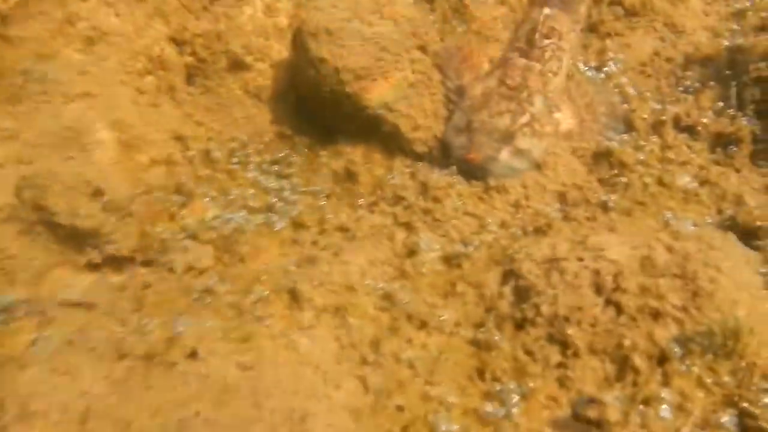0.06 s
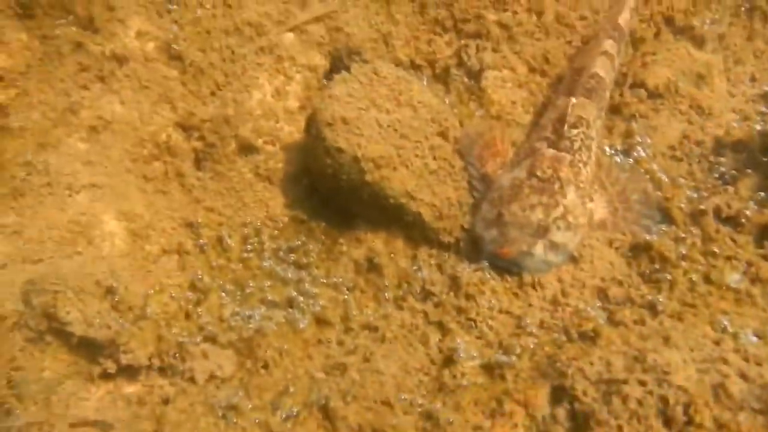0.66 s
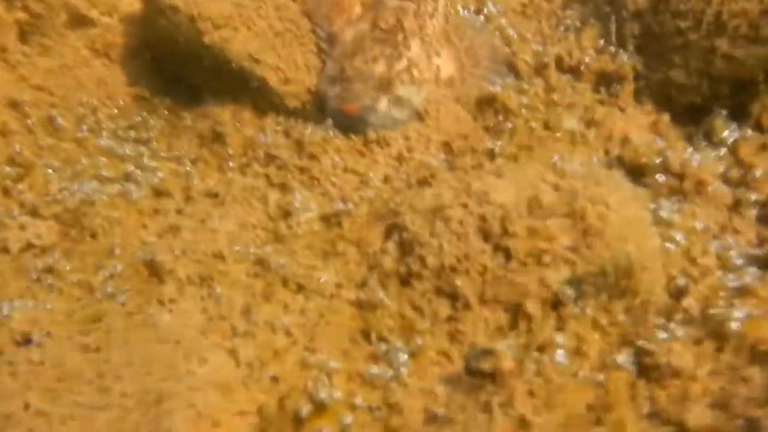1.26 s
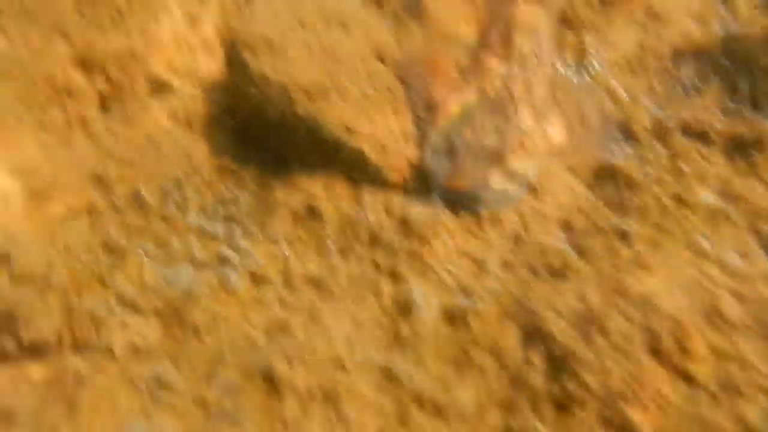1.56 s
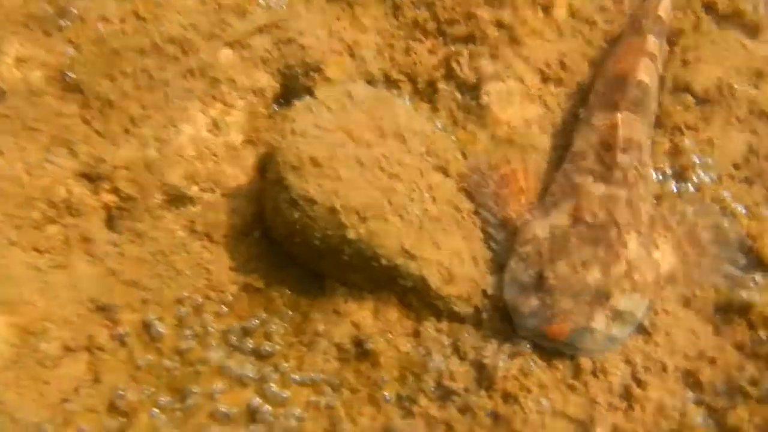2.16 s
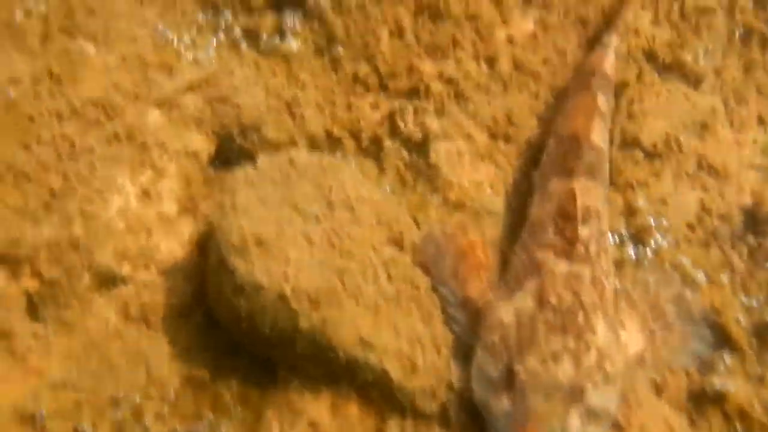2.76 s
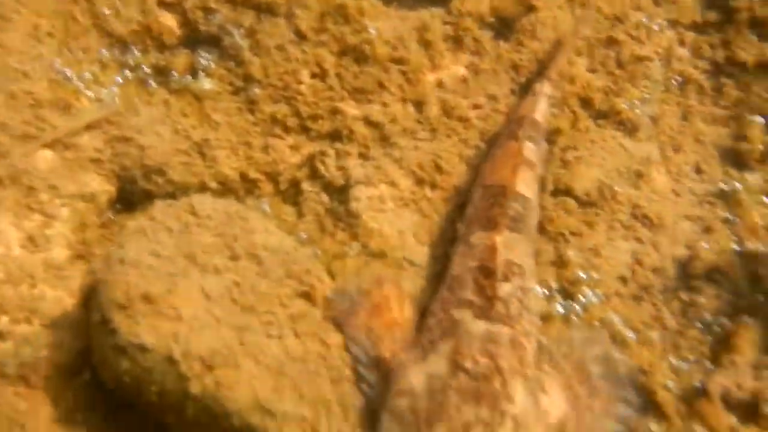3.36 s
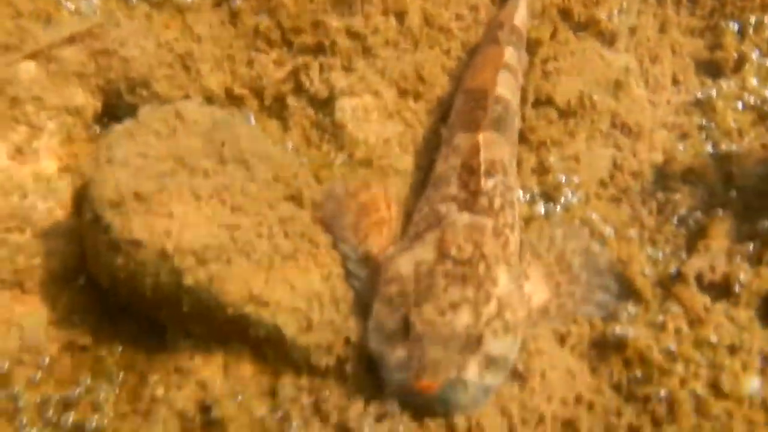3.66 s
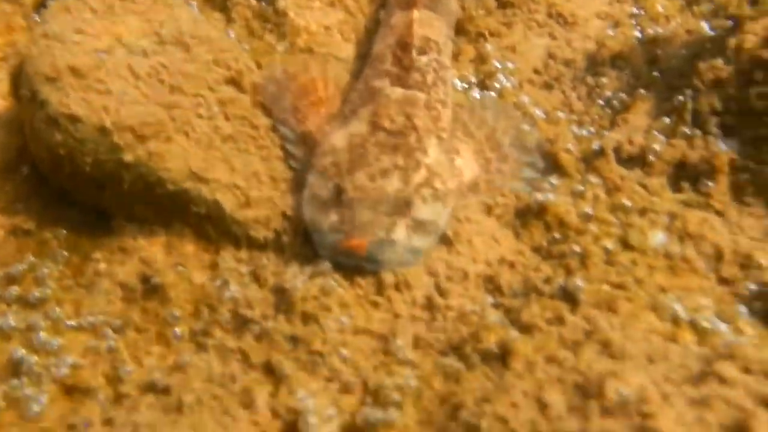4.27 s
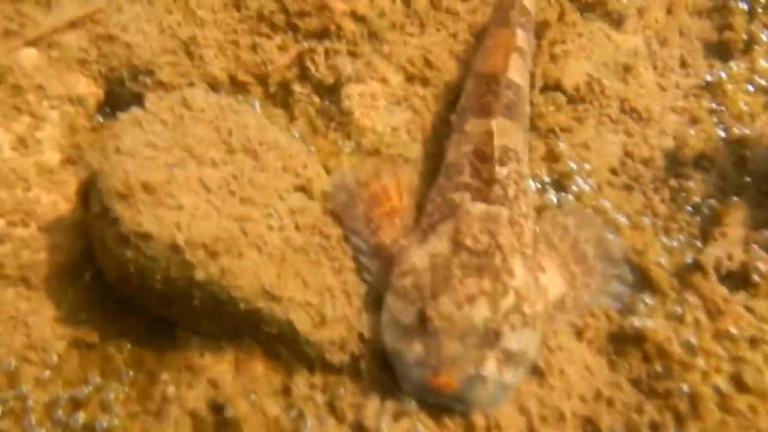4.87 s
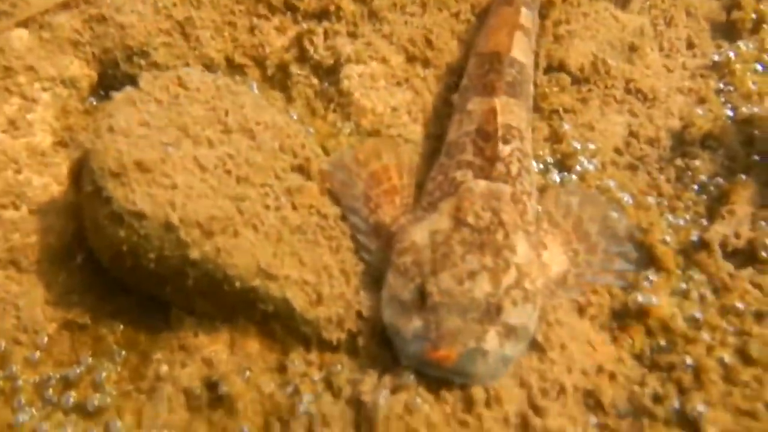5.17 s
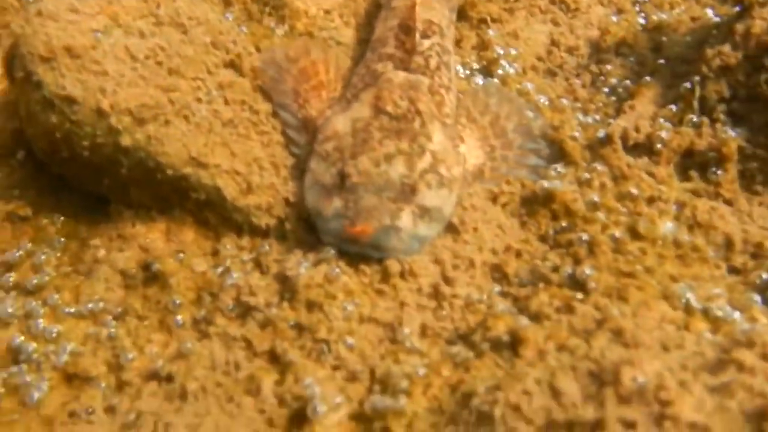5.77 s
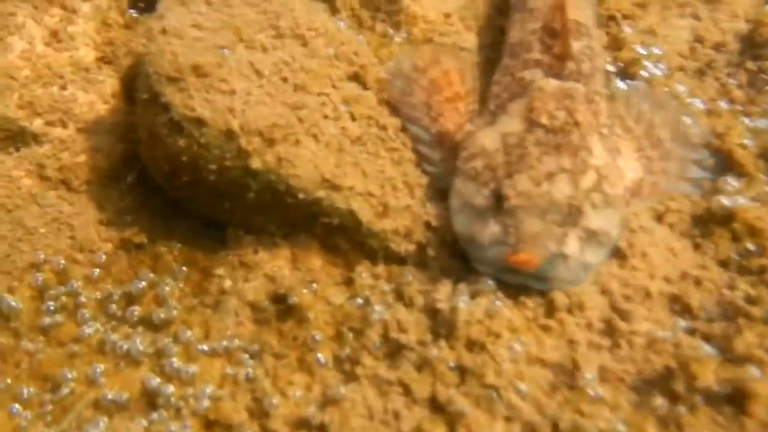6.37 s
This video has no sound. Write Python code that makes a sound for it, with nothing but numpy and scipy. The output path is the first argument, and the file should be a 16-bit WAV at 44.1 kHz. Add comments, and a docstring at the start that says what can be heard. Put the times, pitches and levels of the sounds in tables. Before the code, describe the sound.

A shallow stream is heard through a camera held under water. A low, wavering rumble runs throughout, with irregular dull thumps and glugs from the current, mostly on the left. Beneath it are a soft muffled rush and a faint, fluttering electronic whine. A brief tick comes about halfway. Near the end a finger knocks and rubs on the casing, close and loud, and the water briefly dips in level.

```python
"""In a shallow stream, a camera is held under water. Turbulent pressure rumbles on its two microphone
ports, and eddies break on them with dull thumps, mostly on the left; two of the loudest overload the
recorder with a brief tick. A steady muffled rush and the faint whine of the electronics come through
the casing. Towards the end a finger knocks, shoves and rubs the casing, exciting its damped modes,
and the camera's limiter ducks everything."""
import sys
import numpy as np
from scipy import signal
from scipy.fft import rfft, irfft, next_fast_len
from scipy.io import wavfile
from scipy.ndimage import uniform_filter1d, minimum_filter1d

SR = 44100
rng = np.random.default_rng(int(sys.argv[2]) if len(sys.argv) > 2 else 0)


def unload_audio(sound):
    """Save the sound as a 16-bit wav file, at the path given as the first command line argument."""
    columns = np.transpose(np.atleast_2d(sound))
    # keep every value between -1 and 1, then stretch to whole-number steps
    steps = np.round(np.clip(columns, -1, 1) * 32767)
    wavfile.write(sys.argv[1], SR, steps.astype(np.int16))


N = 291173
TIME = np.arange(N) / SR
FREQ = np.fft.rfftfreq(2 * next_fast_len(N // 2 + 1), 1 / SR)

# slow swell of the current past the ports: t/s, rumble level/dB
CURRENT_SWELL = [(0.0, -19), (0.6, -24), (0.85, -20.5), (0.93, -26.5), (1.05, -21.5), (1.36, -19.5),
                 (1.46, -25), (1.68, -18.5), (2.1, -22.5), (2.35, -23.5), (2.7, -22), (3.2, -22.5),
                 (3.33, -25.5), (3.45, -20.5), (3.95, -23), (4.3, -21), (4.55, -20.5), (4.85, -18.5),
                 (5.15, -22), (5.55, -22.5), (5.95, -20.5), (6.15, -19.5), (6.3, -16), (6.55, -19)]
# relative spectrum of the rumble: f/Hz, left level/dB, right level/dB
RUMBLE_SPECTRUM = [(9.07, -25, -17), (14.12, 9, -25), (27.5, -7.5, -16.5), (55.8, 3, -10.5),
                   (83.2, -5, -29.5), (117, -5, -32.5), (198.5, -10, -26.5), (230, -17.5, -28),
                   (316, -18, -40), (439, -28, -68), (680, -46, -58), (1460, -96, -90)]
# relative spectrum of the rush through the casing: f/Hz, left level/dB, right level/dB, left lead/rad
RUSH_SPECTRUM = [(200, -84, -69, 1.5), (474, -77.5, -71.5, -0.2), (584, -68.5, -72.5, -4),
                 (687, -86.5, -61, 0.3), (832, -67.5, -57, -3.5), (1092, -77.5, -58, -4.5),
                 (1177, -60.5, -57.5, -5.5), (1310, -62.5, -58.5, -5), (1465, -61.5, -59, -5.5),
                 (1570, -60, -61.5, -5.5), (1805, -67, -65, -6.5), (1903, -62, -58, -8.5),
                 (2166, -68.5, -63, -5), (2413, -94.5, -77, -5.5), (2640, -83.5, -77, -9),
                 (3060, -88, -84, -9), (3450, -91.5, -89, -8.5), (4220, -104, -104, -8.5),
                 (8000, -125, -125, -16.5)]
# narrow hollow resonances in the rush: f/Hz, Q, gain/dB
RUSH_RESONANCES = [(1233, 22.4, -4), (1386, 30, -9.5), (1593, 30, -3)]
# microphone self-noise: f/Hz, spectral density level/dB
SELF_NOISE = [(100, -64.5), (3500, -97.5), (6000, -101), (12000, -105), (14000, -108), (15500, -120)]
# steady tones of the electronics: f/Hz, left rms level/dB, right rms level/dB
STEADY_TONES = [(672, -64.5, -55), (962, -66, -59), (1978, -58, -55), (14835, -66.5, -67)]
# envelope of the whine: t/s, relative level/dB
WHINE_ENVELOPE = [(0, -56), (0.28, -63.5), (0.45, -58.5), (0.7, -55), (0.87, -55), (1.0, -71), (1.17, -54),
                  (1.62, -50), (1.92, -57.5), (2.22, -52), (2.38, -64), (2.75, -53.5), (2.86, -61),
                  (2.92, -51), (3.02, -57), (3.11, -48.5), (3.3, -65.5), (3.91, -52.5), (4.05, -65),
                  (4.38, -54.5), (4.6, -75), (4.75, -53), (4.95, -49), (5.2, -59), (5.57, -55),
                  (5.85, -68.5), (6.16, -51), (6.3, -54)]
# dull thumps at the left port (strong eddies, and the finger's shove near 6.2 s):
# t/s, wobble level/dB, wobble f/Hz, wobble length/s, glug level/dB, glug f/Hz, slap level/dB
THUMPS = [(0.126, -18, 208, 0.014, -20, 272.4, -16), (0.198, -16.5, 146, 0.0056, -30, 354, -16),
          (0.408, -11, 147, 0.017, -28, 355, -28), (0.473, -20, 153, .008, -25.5, 342, -23),
          (0.53, -9.5, 136, 0.011, -29, 354, -13), (0.64, -14, 140, 0.016, -26.5, 290.5, -16),
          (0.79, -8, 169, 0.0068, -17, 333, -20), (0.826, -9, 131, 0.021, -27, 308, -24),
          (0.853, -10.5, 169, 0.0096, -19, 311.5, -11), (0.88, -7, 176, 0.013, -19, 338, -14),
          (1.017, -10.5, 135, .009, -32, 332, -30), (1.081, -13, 157, 0.01, -28, 300, -16),
          (1.18, -7, 159, 0.0098, -24, 276, -9), (1.229, -12, 144, 0.0071, -30, 295, -28),
          (1.288, -11, 59.7, 0.025, -47, 300, -30), (1.403, -3, 114, 0.0071, -31, 300, -27),
          (1.546, -16, 170, 0.016, -25, 345, -17), (1.614, -5.5, 184, 0.016, -11, 295.3, -3),
          (1.734, -9.5, 174, 0.013, -18.5, 316, -11), (1.763, -3.5, 146, .0075, -15.5, 320, -11),
          (1.85, -8.5, 178, 0.011, -12.5, 348.5, -6), (1.918, -6.5, 200, .0049, -13, 325.8, -7),
          (1.973, -14, 153, 0.0069, -32, 339, -25), (2.23, -11, 170, 0.0098, -23.5, 325.5, -20),
          (2.321, -6, 145, 0.0071, -19.5, 336, -12), (2.359, -6.5, 124, 0.0066, -30, 291, -15),
          (2.468, -7, 148, 0.009, -43, 265, -28), (2.752, -14.5, 156, 0.011, -24, 345, -15),
          (2.801, -11.5, 135, 0.0098, -25, 296, -28), (2.831, -12, 151, 0.011, -34, 284, -28),
          (3.032, -19, 170, .01, -27, 309, -25), (3.213, 4, 128, 0.006, -20, 321, -22),
          (3.386, -3, 132, 0.0054, -19, 338.5, -24), (3.462, -15, 163, 0.0094, -28, 346, -25),
          (3.623, -10.5, 149, 0.014, -25.5, 268, -28), (3.731, -3.5, 131, 0.012, -17.5, 341, -18),
          (3.78, -9.5, 155, 0.0068, -28, 270, -19), (3.991, -5.5, 156, .0082, -22.5, 333.5, -22),
          (4.13, .5, 134, 0.0081, -17.5, 319, -3), (4.172, -5.5, 134, 0.0067, -23, 291, -22),
          (4.202, -4, 130, 0.009, -20.5, 298, -3.5), (4.304, -11.5, 148, 0.006, -20.5, 283, -10),
          (4.594, -15, 154, 0.0072, -23, 335, -23), (4.628, -3, 140, 0.0067, -15.5, 331.5, -11),
          (4.687, -8, 152, 0.0075, -16.5, 356, -7), (4.731, -8.5, 163, 0.011, -25, 353, -22),
          (4.783, -8.5, 188, 0.018, -15.5, 325, -7), (4.859, -6, 132, 0.016, -23, 333, -9),
          (4.916, -6, 155, 0.007, -13.5, 321.5, -7), (4.949, -14.5, 166, 0.0094, -16.5, 343, -8),
          (5.132, -8.5, 142, 0.0084, -33, 270, -27), (5.325, -6, 202, 0.0039, -16, 280.4, -5),
          (5.357, -4, 153, 0.013, -16.5, 277, -12), (5.4, -4, 170, 0.013, -19, 296, -23),
          (5.466, -8.5, 165, .0078, -15.5, 328, -13), (5.611, -3, 160, 0.0097, -28, 261, -18),
          (5.706, -12, 172, .014, -24, 372.6, -3), (5.785, -14, 165, 0.0098, -18.5, 282.4, -10),
          (5.813, -1, 150, 0.015, -16.5, 340, -3), (6.021, 2, 182, 0.016, -5.5, 329, -4),
          (6.061, -10, 180, 0.0089, -26, 281, -27), (6.133, -13, 173, .008, -21, 290, -20),
          (6.198, 2, 90, 0.023, -1, 278, -23), (6.435, -12, 181, 0.012, -20, 274, 0)]
# normal modes of the casing: f/Hz, T60/s, left level/dB, right level/dB
CASING_MODES = [(158.5, 0.061, -5, -28), (296, 0.038, -1, -26), (415, 0.025, -7.5, -17),
                (688, 0.047, -20, -9.5), (886, 0.02, -21, -7), (984, 0.021, -11, -7),
                (1180, 0.015, -32, -4), (1470, 0.011, 5.5, -21), (1740, 0.0022, 0.5, 5.5),
                (2750, 0.012, -13.5, -12), (3280, 0.0099, -21, -23), (4920, 0.018, -13, -35)]
# two overload ticks, then knocks on the casing: t/s, ring level/dB, crack level/dB, pulse length/s
TICKS_AND_KNOCKS = [(3.2133, -10.5, -20, 0.00025), (6.024, -10.5, -27, 0.00044), (6.171, 10, -12, 0.00024),
                    (6.1746, 14.5, 5, 0.00018), (6.187, 11.5, -1, 0.00044), (6.191, 10, -24, 0.00062),
                    (6.2148, 10.5, -38, 0.00067), (6.2231, 11, -36, .0006), (6.3154, 5, -36, 0.00034),
                    (6.3527, 6, -42, 0.00027)]
# finger strokes, pressed and dull, then light and brighter: peak t/s, level/dB, rise/s, fall/s,
# cutoff f/Hz, share of ring time left, relative crackle level/dB
FINGER_STROKES = [(6.186, 9, 0.018, 0.045, 1390, 1, -4.5), (6.32, 2, 0.064, 0.043, 2400, 0.9, -4)]


def undb(db):
    """Amplitude ratio of a level in decibels."""
    return 10 ** (np.asarray(db) / 20)


def unit(x):
    """Normalisation to rms 1."""
    return x / np.sqrt(np.mean(x ** 2))


def over_hz(table):
    """Linear interpolation of each column over log frequency."""
    hz, *columns = np.transpose(table)
    return np.array([np.interp(np.log(FREQ + 1), np.log(hz), c) for c in columns])


def over_time(table):
    """Linear interpolation over time."""
    return np.interp(TIME, *np.transpose(table))


def noise(gain):
    """Spectral shaping of one white source; each row of gain is an amplitude per root Hz."""
    white = rng.standard_normal(2 * (len(FREQ) - 1))
    return irfft(rfft(white) * gain * np.sqrt(SR / 2))[..., :N]


def port_noise(gain, own_db):
    """Partial coherence: a source common to both ports plus an independent share at each."""
    own = np.array([noise(g) for g in gain])
    return (noise(gain) + undb(own_db) * own) / np.sqrt(1 + undb(own_db) ** 2)


def walk(per_s):
    """Band-limited random fluctuation of rms 1, changing about per_s times a second."""
    return unit(noise(np.exp(-(FREQ / per_s) ** 2)))


def low_pass(x, hz):
    """Second-order low-pass."""
    return signal.sosfilt(signal.butter(2, min(hz, .45 * SR), fs=SR, output="sos"), x)


def band(x, hz, q):
    """A single resonance with unit gain at its centre."""
    return signal.lfilter(*signal.iirpeak(hz, q, fs=SR), x)


def wave_packet(t, hz, length, phase):
    """A pressure transient whose envelope peaks at t = 0; phase in cycles, a plain pulse at 0 Hz."""
    age = np.maximum(1 + 1.73 * t / length, 0)
    return (age * np.exp(1 - age)) ** 2 * np.cos(2 * np.pi * (hz * t + phase))


def rumble(churn_s=0.054, churn_db=7.5, flurry_db=-7, flicker_db=2, buffet_db=1.6):
    """Turbulent pressure on the ports; its upper band comes in flurries, most around the thumps."""
    colour = undb(over_hz(RUMBLE_SPECTRUM))
    upper = 1 / (1 + (110 / (FREQ + 1)) ** 4)  # share of power above a 110 Hz crossover
    churn = sum(undb(db) * np.exp(-((TIME - s) / churn_s) ** 2) for s, db, *_ in THUMPS)
    deep = port_noise(colour * np.sqrt(1 - upper), own_db=-10.5)
    flurry = port_noise(colour * np.sqrt(upper), own_db=-12)
    flurry *= undb(flurry_db + flicker_db * walk(per_s=11) + churn_db * np.tanh(0.75 * churn))
    swell = undb(over_time(CURRENT_SWELL) + buffet_db * walk(per_s=14))
    return (deep + flurry) / np.std(deep.mean(axis=0)) * swell


def rush(level_db=-1, waver_db=3):
    """Transmission through the casing colours an even hiss; narrow resonances swell and fade in it."""
    left_db, right_db, lead = over_hz(RUSH_SPECTRUM)
    gain = np.array([undb(left_db), undb(right_db) * np.exp(-1j * lead)])
    hiss = undb(level_db) * port_noise(gain, own_db=-9)
    hollows = sum(band(hiss, hz, q) * undb(db + waver_db * walk(per_s=7))
                  for hz, q, db in RUSH_RESONANCES)
    return hiss + hollows


def electronics(whine_hz=2498, frames_per_s=25, flicker_db=3.2, left_db=-2, right_db=5):
    """Amplitude modulation swells a whine once a frame, over thin tones and microphone self-noise."""
    steady = np.array([noise(undb(over_hz(SELF_NOISE)[0])) for _ in range(2)])
    for hz, *port_db in STEADY_TONES:
        phase = 2 * np.pi * hz * TIME + 0.22 * walk(per_s=4.2)
        steady += undb(port_db)[:, None] * np.sqrt(2) * np.sin(phase)
    envelope = undb(over_time(WHINE_ENVELOPE) + flicker_db * walk(per_s=32))
    pulsing = envelope * np.sin(np.pi * frames_per_s * TIME)
    whine = 2 * pulsing * np.sin(2 * np.pi * whine_hz * TIME + 0.17 * walk(per_s=9))
    return steady + undb([[left_db], [right_db]]) * whine


def weak_eddies(count=60, per_s=5, length_s=0.019, glug_db=-28, glug_hz=317.9, slap_db=-29.5):
    """Small eddies arrive at log-normal intervals; their rows are like those of THUMPS."""
    gap, size, pitch = rng.standard_normal((count, 3)).T
    times = np.cumsum(np.exp(gap / 2) / per_s)
    wobble_db = -20 - 0.5 * size
    wobble_hz = 160.4 * 2 ** (0.39 * pitch)
    return [(s, db, hz, length_s, glug_db, glug_hz, slap_db)
            for s, db, hz in zip(times, wobble_db, wobble_hz)]


def thumps(lead_s=0.00322, slap_s=0.00095, glug_s=0.012, fall_octaves_per_s=20.06, wall_hz=740):
    """Pressure transients of eddies and the finger's shove: a wall slap, falling glug and low wobble."""
    wobble, glug, slap = np.zeros((3, N))
    for s, db, hz, length, glug_db, glug_hz, slap_db in list(THUMPS) + weak_eddies():
        phase, glug_phase = rng.random(2)
        near = slice(max(int((s - .04) * SR), 0), int((s + .12) * SR))
        t = TIME[near] - s
        early = t + lead_s  # slap and glug peak ahead of the wobble
        falling_hz = glug_hz * 2 ** (-fall_octaves_per_s * early)
        sweep = glug_phase + np.cumsum(falling_hz) / SR
        wobble[near] += undb(db) * wave_packet(t, hz, length, phase)
        glug[near] += undb(glug_db) * wave_packet(early, 0, glug_s, sweep)
        slap[near] += undb(slap_db) * wave_packet(early, 0, slap_s, 0)
    wall = band(band(slap, wall_hz, q=0.7), wall_hz, q=0.7)
    left = wobble + glug + undb(-16) * wall
    right = undb(-19) * wobble + undb(-11) * glug + undb(-4) * wall  # the sheltered port
    return np.array([left, right])


def casing_ring(force, ring_share=1, cutoff_hz=3200):
    """Modal response of the water-damped casing; a finger on it leaves a share of the ring time."""
    t = TIME[:SR // 8]
    modes = np.zeros((2, len(t)))
    for k, (hz, t60, left_db, right_db) in enumerate(CASING_MODES):
        decay = np.exp(-np.log(1000) * t / (t60 * ring_share))
        modes += (-1) ** k * undb([[left_db], [right_db]]) * np.sin(2 * np.pi * hz * t) * decay
    return signal.fftconvolve(force[None], low_pass(modes, cutoff_hz), axes=1)[:, :N]


def ticks_and_knocks(crack_hz=2900, crack_t60_s=0.006):
    """Impulse responses: overload ticks and finger knocks each sound as a ring and a short crack."""
    force, impulses = np.zeros((2, N))
    for s, ring_db, crack_db, pulse_s in TICKS_AND_KNOCKS:
        pulse = wave_packet(TIME - s, 0, pulse_s, 0)  # a longer pulse rings only the low modes
        force += undb(ring_db) * pulse / pulse.sum()
        impulses[int(s * SR)] += undb(crack_db)
    t = TIME[:SR // 8]
    decay = np.exp(-np.log(1000) * t / crack_t60_s)
    crack = low_pass(rng.standard_normal((2, len(t))) * decay, crack_hz)
    return casing_ring(force) + signal.fftconvolve(impulses[None], crack, axes=1)[:, :N]


def finger_rubs(slips_per_s=4000, skin_hz=4000, grit_db=-24, fade_db=20):
    """Stick-slip friction: a finger's dense little slips ring the casing and crackle on its skin."""
    slips = unit((rng.random(N) < slips_per_s / SR) * rng.standard_normal(N))
    crackle = low_pass(low_pass(slips * rng.standard_normal((2, N)), skin_hz), skin_hz)
    rubs = np.zeros((2, N))
    for s, db, rise_s, fall_s, hz, ring_share, crackle_db in FINGER_STROKES:
        from_peak = np.maximum((s - TIME) / rise_s, (TIME - s) / fall_s)
        pressure = undb(grit_db + db - fade_db * from_peak ** 2)
        rubs += casing_ring(low_pass(slips, hz) * pressure, ring_share)
        rubs += undb(crackle_db) * crackle * pressure
    return rubs


def limiter(x, ceiling_db=-0.1, release_db_per_s=22):
    """Look-ahead limiting: both channels duck just before a peak over the ceiling, then creep back."""
    peak_db = 20 * np.log10(np.abs(x).max(axis=0) + 1e-9)
    excess_db = np.maximum(peak_db - ceiling_db, 0)
    recovery = release_db_per_s * TIME
    gain_db = recovery - np.maximum.accumulate(excess_db + recovery)
    held_db = minimum_filter1d(gain_db, size=16)
    return x * undb(uniform_filter1d(held_db, size=16))


def scene():
    """Superposition of all sources in the left and right channels."""
    return rumble() + rush() + electronics() + thumps() + ticks_and_knocks() + finger_rubs()


def record(dry):
    """The camera limits the peaks, then the bandwidth, with a steep low-pass at 15.6 kHz."""
    return signal.sosfilt(signal.ellip(8, .2, 70, 15600, fs=SR, output="sos"), limiter(dry))


dry = scene()
out = record(dry)
unload_audio(out)
```